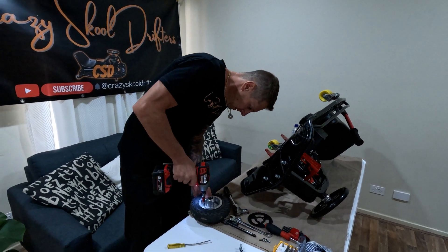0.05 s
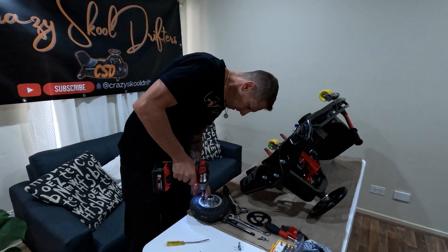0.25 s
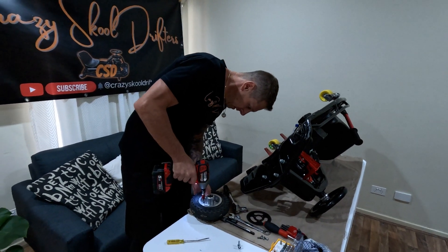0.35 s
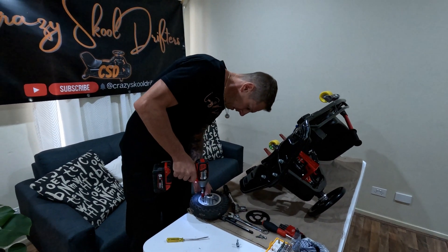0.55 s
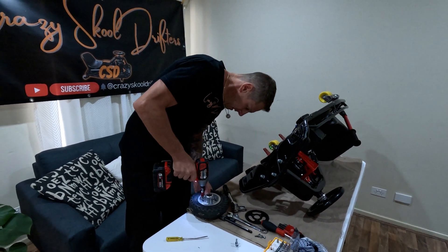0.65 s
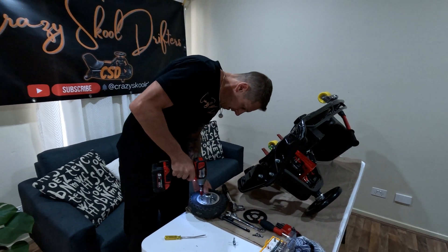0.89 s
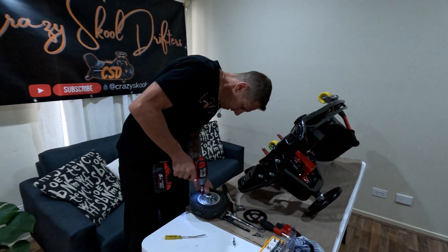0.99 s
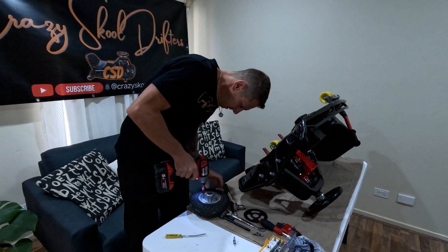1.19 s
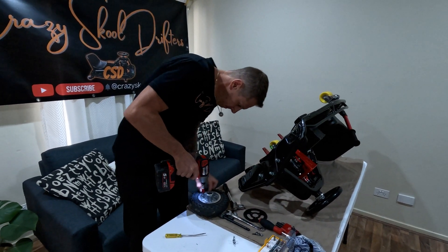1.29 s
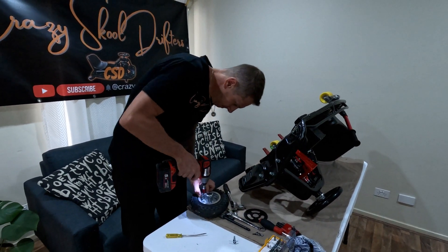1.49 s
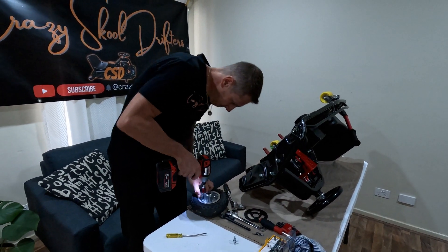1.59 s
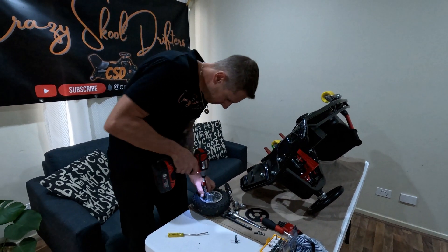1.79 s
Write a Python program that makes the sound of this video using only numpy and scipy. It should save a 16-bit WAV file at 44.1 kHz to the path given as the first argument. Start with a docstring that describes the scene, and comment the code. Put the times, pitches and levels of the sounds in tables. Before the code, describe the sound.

A cordless drill starts near 0.2 s with a brief high whistle, then sharp knocks and table thumps until 0.4 s as a tight bolt gives. Gears whir up quickly around 0.5 s, the socket rattling until 0.9 s. The whine falls, with small squeaks near 1.0 s, and stops with a click at 1.26 s. Room echo fades; faint metal clinks come around 1.6 s.

```python
"""Cordless drill undoing a bolt

On a small wheel lying on a table in a living room, a bolt breaks loose with knocks and table thumps.
The drive whistles, gears whir, the socket rattles, and the motor winds down and stops with a click.
Loose metal clinks as the drill is lifted. Contacts are noise bursts, whines are sines that follow the
motor, gears are trains of tooth clicks, and table and metal are sets of decaying tones."""
import sys
import numpy as np
from scipy import signal
from scipy.fft import rfft, irfft
from scipy.io import wavfile

SR = 44100
rng = np.random.default_rng(int(sys.argv[2]) if len(sys.argv) > 2 else 0)


def unload_audio(sound):
    """Save the sound as a 16-bit wav file, at the path given as the first command line argument."""
    columns = np.transpose(np.atleast_2d(sound))
    # keep every value between -1 and 1, then stretch to whole-number steps
    steps = np.round(np.clip(columns, -1, 1) * 32767)
    wavfile.write(sys.argv[1], SR, steps.astype(np.int16))


N = 81585  # length in samples
T = np.arange(N) / SR  # time in seconds
STOP_S = 1.262  # the motor stops around this time

# how loud the gear noise is meant to be, before it wavers [t/s, level/dB]
GEAR_LEVEL = [(.18, -78), (.205, -36.5), (.219, -36), (.235, -23.5), (.29, -29), (.34, -32), (.38, -30),
              (.46, -34.5), (.56, -35), (.68, -34.5), (.85, -33.5), (1.0, -37.5), (1.1, -38.5),
              (1.2, -38.5), (1.26, -40.5), (1.29, -26)]
# tone colour of knocking metal, for the knocks and the ticks of the clinks [f/Hz, level/dB]
KNOCK_COLOUR = [(200, -17.5), (500, -24.5), (900, -2), (1600, -2.5), (3200, 3.5), (4500, -0.5), (5800, 7),
                (6700, -3), (9700, -4), (12000, -13), (15000, -37.5)]


def undb(db):
    """Turn decibels into a gain."""
    return 10 ** (np.asarray(db) / 20)


def unit(x):
    """Scale to an rms of 1."""
    return x / np.sqrt(np.mean(x ** 2))


def curve(rows):
    """Join (s, value) rows by straight lines over the whole scene."""
    return np.interp(T, *np.array(rows).T)


def across(rows, size=N):
    """Join (Hz, value) rows on a log axis, giving one value per frequency bin."""
    hz, value = np.array(rows).T
    bins_hz = np.arange(size // 2 + 1) * SR / size
    return np.interp(np.log(bins_hz + 1), np.log(hz), value)


def colour(x, rows):
    """Filter with a (Hz, dB) shape scaled to unit power, without any sound ahead of its cause."""
    size = 2 * N
    gain = unit(undb(across(rows, size=size)))
    # folding the cepstrum forward in time gives a minimum-phase filter
    cepstrum = irfft(np.log(gain))
    cepstrum[1:N] *= 2
    cepstrum[N + 1:] = 0
    return irfft(rfft(x, size) * np.exp(rfft(cepstrum)))[:N]


def walk(hz):
    """Smooth random drift with an rms of 1; a higher hz makes it quicker."""
    smoothing = np.exp(-(np.fft.rfftfreq(N, 1 / SR) / hz) ** 2)
    return unit(irfft(rfft(rng.standard_normal(N)) * smoothing, N))


def pair():
    """Noise from all around at two close microphones, alike or unlike depending on the frequency."""
    # how alike left and right are [f/Hz, likeness/0-1]
    likeness = [(25, 0.62), (70, 0.86), (280, 0.78), (700, 0.48), (3000, 0.39), (6000, 1), (10000, .1)]
    like = np.clip(across(likeness), 0, 1)
    mid, side = rfft(rng.standard_normal((2, N)))
    shared = mid * np.sqrt((1 + like) / 2)
    opposed = np.array([[1], [-1]]) * side * np.sqrt((1 - like) / 2)
    return irfft(shared + opposed, N)


def bursts(rows):
    """Short scraping contacts: noise that starts at once and dies away."""
    power = np.zeros(N)
    for start_s, db, decay_s in rows:
        power += (T >= start_s) * undb(db) ** 2 * np.exp(-2 * np.abs(T - start_s) / decay_s)
    return np.sqrt(power) * rng.standard_normal(N)


def ring(hits, modes, spread_db, detune):
    """Each hit makes a solid ring at its modes, with slightly different strengths and pitches."""
    out = np.zeros(N)
    hz, gain_db, t60 = np.array(modes).T[:, :, None]
    for start_s, db in hits:
        start = int(start_s * SR)
        weight, shift = rng.standard_normal((2, len(modes), 1))
        t = T[:N - start][:SR // 2]  # at most half a second
        fading = undb(gain_db + spread_db * weight - 60 * t / t60)
        tones = fading * np.sin(2 * np.pi * hz * (1 + detune * shift) * t)
        out[start:][:len(t)] += undb(db) * tones.sum(0) / np.sqrt(len(modes))
    return out


def background():
    """Quiet steady noise, mostly deep bass, at two channels."""
    # tone colour of the background [f/Hz, level/dB]
    floor = [(12, -31), (20, 17), (50, -1.5), (97, -62), (139, -3), (286, -10), (674, -19), (1350, -9.5),
             (1680, -8.5), (1930, -18.5), (2280, -13), (3180, -20), (11700, -29), (15000, -83)]
    return undb(-60) * np.array([colour(side, floor) for side in pair()])


def room():
    """Response of the room: a diffuse tail that builds quickly and fades band by band."""
    # time for the tail to fall by 60 dB in each band [f/Hz, t60/s]
    fade_times = [(150, .5), (600, 0.68), (1500, 0.76), (5000, 0.77), (12000, 0.46)]
    build_s = 0.002
    noise, tail = rfft(pair()), 0
    for k, (_, t60) in enumerate(fade_times):
        # this band is full at its own frequency and gone at its neighbours'
        band = across([(row[0], float(j == k)) for j, row in enumerate(fade_times)])
        fade = (1 - np.exp(-(T / build_s) ** 2)) * np.exp(-np.log(1000) * T / t60)
        tail = tail + irfft(noise * band, N) * fade / np.sqrt(np.sum(fade ** 2))
    return tail


def scatter():
    """Response of the table and the body close to the source: a very short spray of reflections."""
    level_db, decay_s = -5, .004
    fade = np.exp(-T / decay_s)
    return undb(level_db) * pair() * fade / np.sqrt(np.sum(fade ** 2))


def table_thumps():
    """Soft pushes ring the table and wheel; the table top radiates little deep bass."""
    # thumps passed into the table, before the overall gain [t/s, level/dB]
    thumps = [(.222, -37), (.245, -18), (.265, -18.5), (.281, -14.5), (.307, -14.5), (.355, -37),
              (.41, -31), (.6, -46), (.83, -52), (1.0, -50), (1.595, -58), (1.635, -55.5), (1.665, -50)]
    # ringing modes of the table and wheel [f/Hz, level/dB, t60/s]
    table_modes = [(116, -1, 0.047), (146.2, -6, 0.26), (182.4, 5, 0.084), (244, 2, 0.094),
                   (269.7, 6, 0.19), (329, 0.5, .12), (445, -18.5, .2)]
    push_s, low_cut_hz, gain_db = 0.001, 92, 1.5
    ringing = ring(thumps, table_modes, spread_db=1.5, detune=0.0033)
    # a push that takes time softens the start of each thump
    soft = np.exp(-1 / (push_s * SR))
    ringing = signal.lfilter([1 - soft], [1, -soft], ringing)
    bass_cut = signal.butter(4, low_cut_hz, "high", fs=SR, output="sos")
    return undb(gain_db) * signal.sosfilt(bass_cut, ringing)


def table_rumble():
    """The drill shakes the table: low noise that swells and fades."""
    # how strong the rumble is [t/s, level/dB]
    rumble = [(.2, -91.5), (.3, -24.5), (.5, -51), (.63, -57), (.88, -55), (1.1, -65.5), (1.3, -77)]
    # tone colour of the rumble [f/Hz, level/dB]
    rumble_colour = [(30, -12.5), (60, -7.5), (105, -2), (160, -5), (270, -8.5), (400, -12.5), (1500, -55)]
    return colour(undb(curve(rumble)) * rng.standard_normal(N), rumble_colour)


def clinks():
    """Loose metal parts touch: each hit gives a short tick and rings high modes."""
    # hits between loose parts [t/s, level/dB]
    clink_hits = [(1.577, -46.5), (1.602, -57), (1.611, -51.5), (1.634, -45), (1.6541, -49.5),
                  (1.659, -44.5), (1.668, -48)]
    # ringing modes of the metal [f/Hz, level/dB, t60/s]
    metal_modes = [(2530, -11, .04), (3040, -1, .05), (4180, 1, .05), (4300, -5, .03), (6050, -5, .035),
                   (6300, -2, .04), (7890, -9, .02), (10300, -12, .015)]
    tick_db, tick_decay_s = -4, .0015
    ticks = colour(bursts([(s, db, tick_decay_s) for s, db in clink_hits]), KNOCK_COLOUR)
    return ring(clink_hits, metal_modes, spread_db=5.0, detune=0.005) + undb(tick_db) * ticks


def lock_click():
    """The spindle lock clicks as the motor stops: one very short burst of noise."""
    # the click [t/s, level/dB, decay/s]
    lock = [(1.2648, -18, .0011)]
    # its tone colour [f/Hz, level/dB]
    lock_colour = [(300, -35), (1500, -8.5), (3500, -5), (5050, 13), (6000, 0), (7000, 3), (8200, -18),
                   (9600, -5), (11000, 2), (15000, -32)]
    return colour(bursts(lock), lock_colour)


def socket_rattles():
    """The loose socket rattles: short bursts coloured by the socket's resonances."""
    # rattles while the drill runs, the last two faint as it begins to slow [t/s, level/dB, decay/s]
    rattles = [(.561, -26.5, 0.0048), (.6035, -25.5, 0.0057), (.638, -22, 0.0028), (.6645, -21, .002),
               (.68, -16, 0.0022), (.7055, -20, 0.0012), (.72, -16.5, 0.0015), (.7585, -23, 0.004),
               (.7985, -15.5, 0.0011), (.84, -20, 0.00068), (.876, -32, 0.0027), (.923, -35, .003)]
    # tone colour of the socket [f/Hz, level/dB]
    socket_colour = [(500, -15), (1800, -17.5), (3800, -11), (5050, 10.5), (6000, -9.5), (7000, -3.5),
                     (8200, -18.5), (9700, 4.5), (11000, -12), (15000, -26)]
    return colour(bursts(rattles), socket_colour)


def socket_squeaks():
    """The socket slips on the bolt head: scraping bursts in narrow bands of pitch."""
    # squeaks [t/s, level/dB, decay/s]
    squeaks = [(.9765, -22.5, 0.0051), (1.001, -24, 0.0069), (1.1285, -33.5, 0.011)]
    # their tone colour [f/Hz, level/dB]
    squeak_colour = [(500, -30), (800, -7.5), (2000, -11), (5500, -17), (5850, 8.5), (6300, 0), (6700, -35),
                     (10500, -15), (11500, -13), (12500, -12), (15000, -38)]
    return colour(bursts(squeaks), squeak_colour)


def bolt_knocks():
    """The socket knocks on the tight bolt: sudden contacts that die away fast."""
    # knocks [t/s, level/dB, decay/s]
    knocks = [(.1848, -31, 0.0033), (.2215, -20.5, 0.01), (.2425, -15.5, .004), (.2518, -9.5, 0.0012),
              (.26, -15.5, 0.0043), (.281, -26.5, 0.0039), (.286, -8, 0.00079), (.3135, -11, 0.0013),
              (.359, -22.5, 0.0038), (.379, -16, 0.00053)]
    return colour(bursts(knocks), KNOCK_COLOUR)


def motor_speed():
    """Turns per second of the motor as it spins up and winds down, with a slight flutter."""
    # speed before the flutter [t/s, speed/turns per s]
    speed = [(.18, 30), (.3, 70), (.45, 140), (.5, 230), (.53, 295), (.56, 358), (.59, 387), (.65, 404),
             (.72, 416), (.82, 417), (.88, 402), (.92, 391), (.96, 369), (1.0, 338), (1.05, 305),
             (1.1, 272), (1.18, 220), (1.26, 181)]
    flutter = .002  # rms share of the speed
    return curve(speed) * (1 + flutter * walk(hz=40))


def drive_whistle():
    """A brief whistle of the drive at one fixed pitch, before the rotor picks up."""
    # how loud the whistle is, silent outside these times [t/s, level/dB rms]
    whistle = [(.14, -76), (.146, -61.5), (.18, -54), (.205, -34.5), (.215, -45), (.235, -63)]
    whistle_hz = 7680
    level = undb(np.interp(T, *np.array(whistle).T, left=-np.inf, right=-np.inf))
    return np.sqrt(2) * level * np.sin(2 * np.pi * whistle_hz * T)


def whine(speed):
    """Motor and meshing teeth sing at multiples of the motor speed once the bolt runs free."""
    # levels before they waver: motor whine, tooth whine and its octave [t/s, level/dB rms]
    motor_whine = [(.5, -40), (.56, -47.5), (.61, -39), (.65, -61), (0.849, -52), (.89, -37), (.96, -38.5),
                   (1.05, -44), (1.12, -57)]
    tooth_whine = [(.49, -59), (.535, -40), (.58, -53), (.82, -52), (.93, -44.5), (.99, -50), (1.03, -36.5),
                   (1.151, -44), (1.24, -42)]
    octave_whine = [(.52, -42), (.57, -43.5), (.7, -47), (.86, -50.5), (.97, -48), (1.04, -47), (1.2, -64)]
    # higher multiples of the tooth whine [multiple, level/dB against GEAR_LEVEL]
    overtones = [(3, -20), (4, -17), (5, -30)]
    motor_order, tooth_order = 8, 5.85  # cycles per motor turn
    from_s, rise_s, fall_s = .47, .05, 0.038

    angle = 2 * np.pi * np.cumsum(speed) / SR
    lines = [(motor_order, motor_whine), (tooth_order, tooth_whine), (2 * tooth_order, octave_whine)]
    tones = np.zeros(N)
    for order, level in lines:
        tones += undb(curve(level) + 2 * walk(hz=49.7)) * np.sin(order * angle)
    for multiple, db in overtones:
        level = undb(curve(GEAR_LEVEL) + db + 4.7 * walk(hz=40.2))
        tones += level * np.sin(multiple * tooth_order * angle)
    running = np.clip((T - from_s) / rise_s, 0, 1) * np.clip((STOP_S - T) / fall_s, 0, 1)
    return np.sqrt(2) * tones * running


def tooth_clicks(turns, count):
    """Tooth contacts whose uneven pattern comes round with each turn of the planet carrier."""
    scatter_db, jitter_s = 5, .000012  # random spread of strength and timing
    place, strength = rng.random(count), rng.exponential(size=count)
    at = np.arange(int(turns[-1]) + 1)[:, None] + place
    late, uneven = rng.standard_normal((len(at), 2, count)).transpose(1, 0, 2)
    when = np.interp(at, turns, T) + jitter_s * late
    where = np.clip(when * SR, 0, N - 2).ravel()
    size = np.sqrt(strength) * undb(scatter_db * uneven)
    # clicks alternate in sign, and none comes after the last turn
    size = (size * (-1) ** np.arange(count) * (at < turns[-1])).ravel()
    # share each click between the two nearest samples
    i = where.astype(int)
    return np.bincount(i, size * (1 - where + i), N) + np.bincount(i + 1, size * (where - i), N)


def gears(speed):
    """Tooth chatter and fan air through the housing; under load the teeth grind and it sounds darker."""
    # tone colour of the housing under load, then running free [f/Hz, level/dB]
    loaded_colour = [(150, -22), (400, -16), (600, -14), (950, -2.5), (1400, -2), (2300, 1.5), (4000, -2),
                     (5100, -.5), (6400, -8), (9800, -12), (13000, -23), (15000, -33), (16000, -45)]
    free_colour = [(60, -45), (110, -18.5), (300, -13.5), (500, -19), (750, -8), (1100, -9), (1800, -4.5),
                   (2200, -6), (3100, -4.5), (3900, -7), (4900, -2.5), (5700, -8.5), (7000, -8),
                   (8500, -11.5), (9700, -10), (11200, -18), (12100, -20), (13800, -25), (15000, -45.5)]
    carrier_ratio = 5.81  # motor turns per turn of the planet carrier
    freed_s, freeing_s = .48, 0.044  # middle and time scale of the change from loaded to free
    start_s, grind_db, air_db = 0.16, 2.5, -0.5  # noise levels are against the tooth clicks

    teeth = unit(tooth_clicks(np.cumsum(speed) / SR / carrier_ratio, count=136))
    running = np.interp(T, [start_s, start_s + .005, STOP_S + 0.0082, STOP_S + 0.032], [0, 1, 1, 0])
    level = running * undb(curve(GEAR_LEVEL) + 2.15 * walk(hz=65))
    air, grind = rng.standard_normal((2, N))
    free = .5 + .5 * np.tanh((T - freed_s) / freeing_s)
    loaded_noise = (teeth + undb(grind_db) * grind) * level * (1 - free)
    free_noise = (teeth + undb(air_db) * air) * level * free
    return undb(-4) * colour(loaded_noise, loaded_colour) + undb(-5.5) * colour(free_noise, free_colour)


def place(sound):
    """Set the sound between the two channels by a tiny lag on the left and a level difference."""
    # left over right [f/Hz, level/dB]
    balance = [(500, 0.45), (4000, 0.5), (8000, 0), (12000, 3)]
    left_lag_s = .000016
    hz = np.fft.rfftfreq(N, 1 / SR)
    lag = np.exp(-2j * np.pi * hz * np.array([[left_lag_s], [0]]))
    gain = undb(np.array([[.5], [-.5]]) * across(balance))
    return irfft(rfft(sound) * lag * gain, N)


def scene():
    """Drill, socket, table and loose metal in the room, over a quiet background."""
    speed = motor_speed()
    low = table_thumps() + table_rumble()
    metal = clinks() + socket_rattles() + socket_squeaks() + bolt_knocks()
    lock = lock_click()
    tones = drive_whistle() + whine(speed)
    chatter = gears(speed)

    # how much of each source goes into the room
    sent = undb(-15.5) * low + undb(-7.5) * metal + undb(-20) * lock
    sent = sent + undb(-3.5) * tones + undb(-2.5) * chatter
    echoes = signal.fftconvolve(sent[None], room(), axes=1)[:, :N]
    near = signal.fftconvolve((metal + lock)[None], scatter(), axes=1)[:, :N]
    direct = low + metal + lock + tones + chatter
    return place(direct + echoes + near) + background()


def record(dry):
    """A steep low-pass filter takes away the treble above 15.5 kHz."""
    return signal.sosfilt(signal.ellip(8, .2, 80, 15500, fs=SR, output="sos"), dry)


dry = scene()
out = record(dry)
unload_audio(out)
```